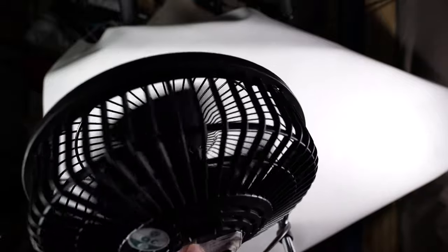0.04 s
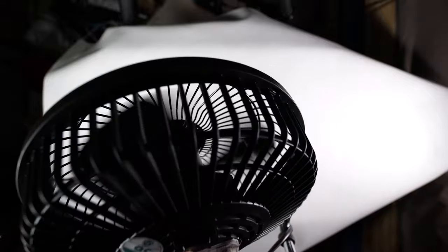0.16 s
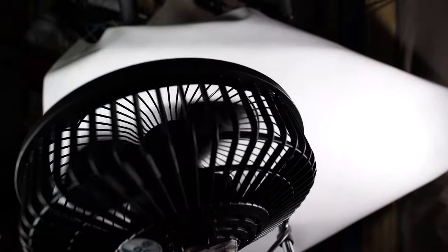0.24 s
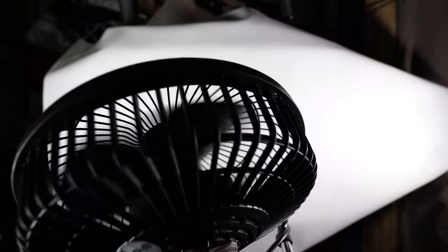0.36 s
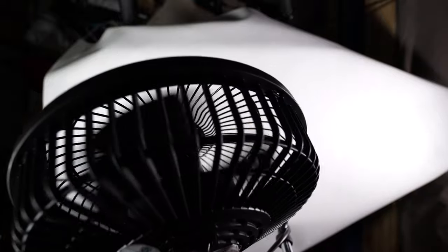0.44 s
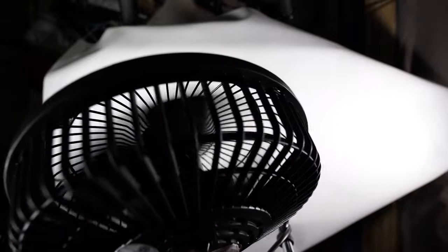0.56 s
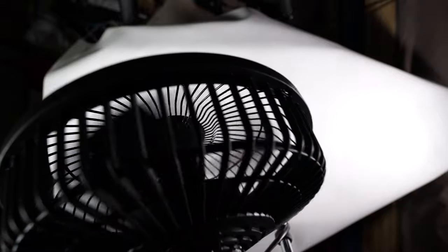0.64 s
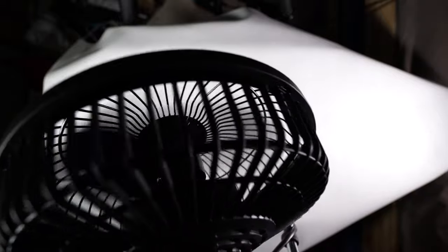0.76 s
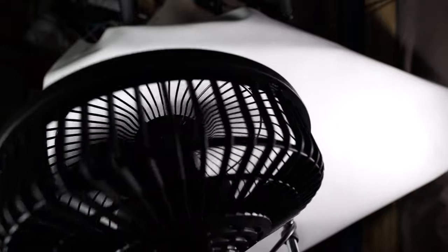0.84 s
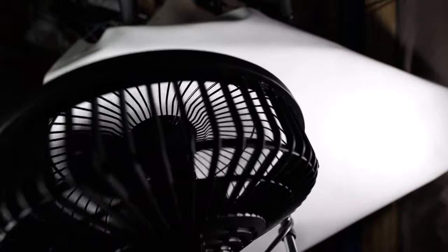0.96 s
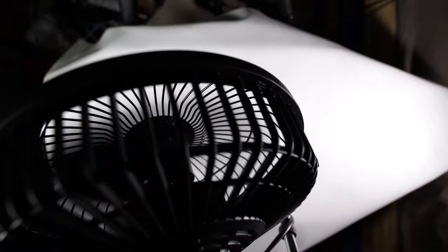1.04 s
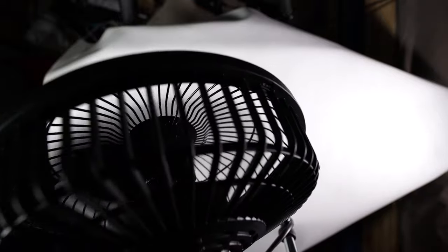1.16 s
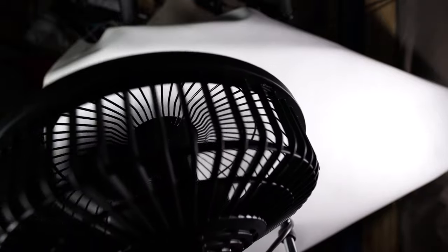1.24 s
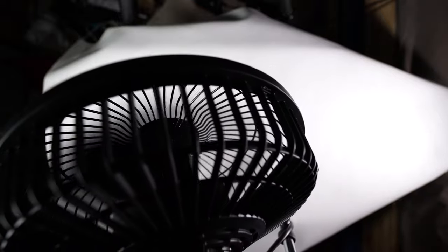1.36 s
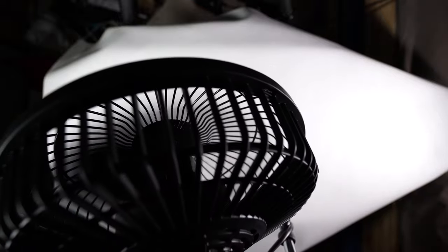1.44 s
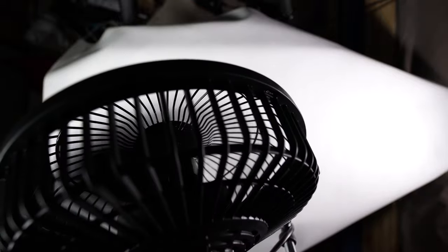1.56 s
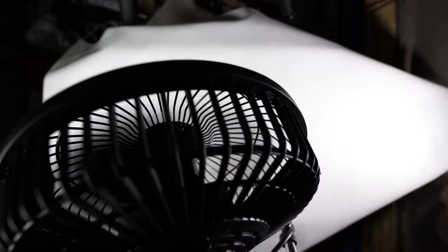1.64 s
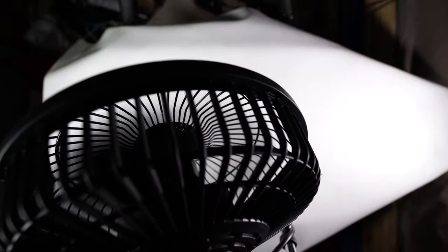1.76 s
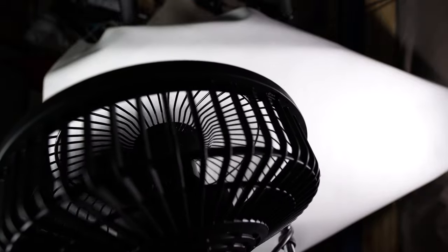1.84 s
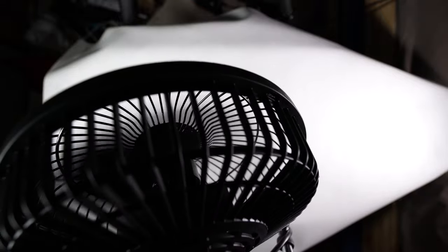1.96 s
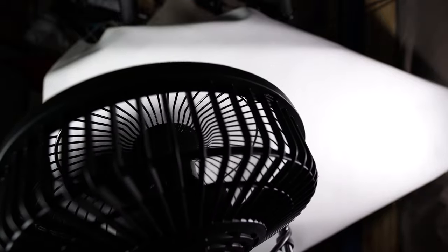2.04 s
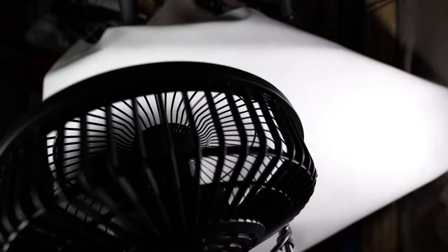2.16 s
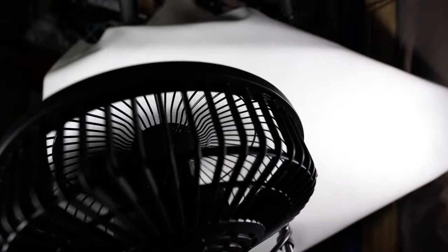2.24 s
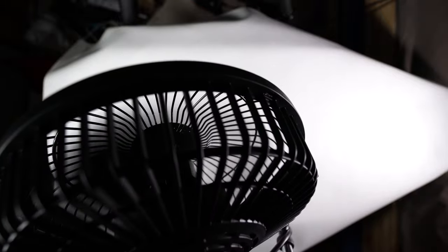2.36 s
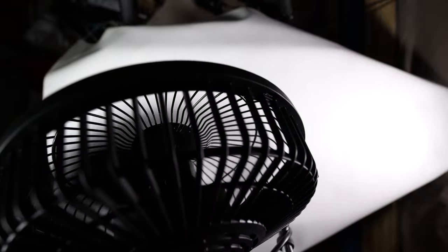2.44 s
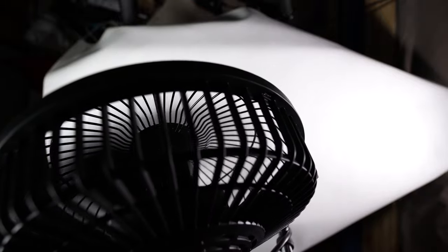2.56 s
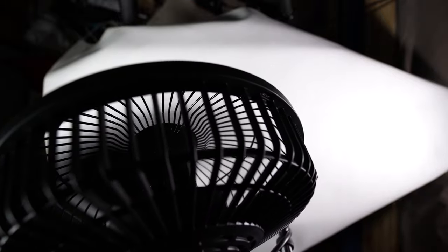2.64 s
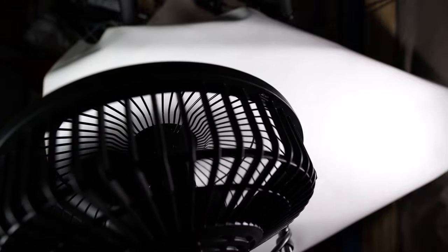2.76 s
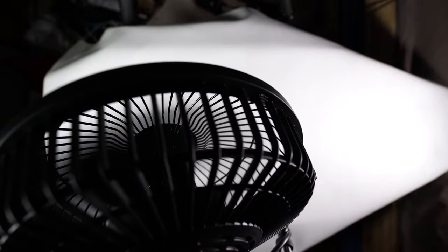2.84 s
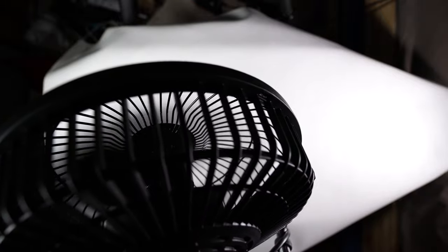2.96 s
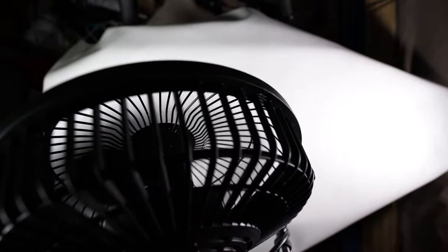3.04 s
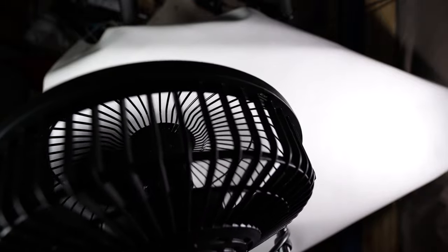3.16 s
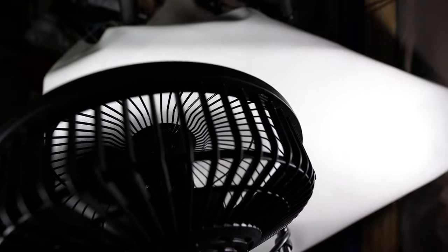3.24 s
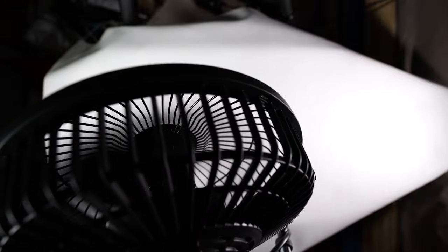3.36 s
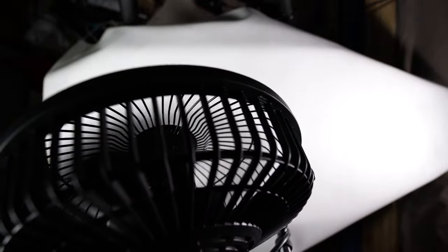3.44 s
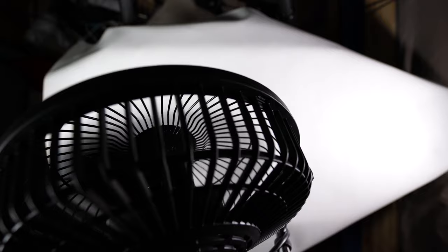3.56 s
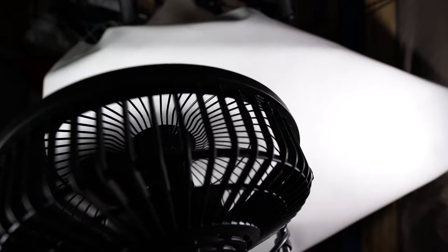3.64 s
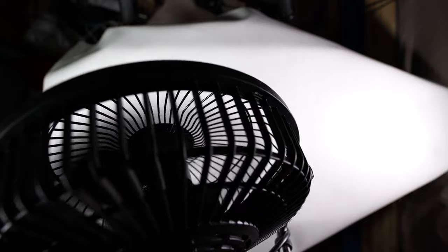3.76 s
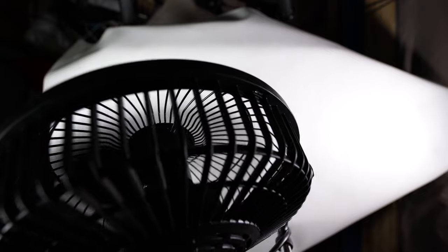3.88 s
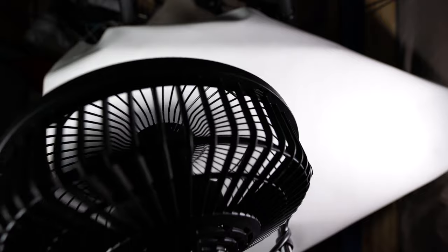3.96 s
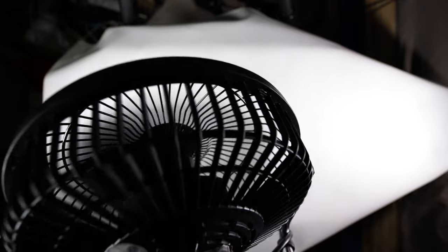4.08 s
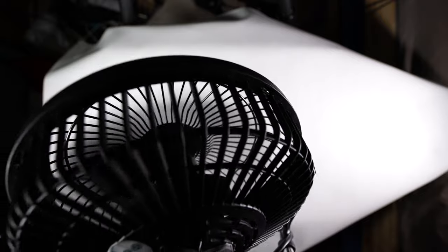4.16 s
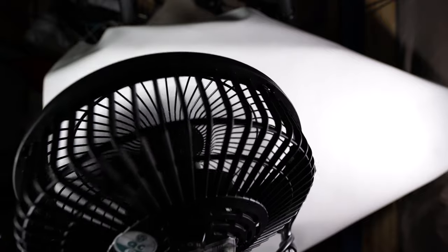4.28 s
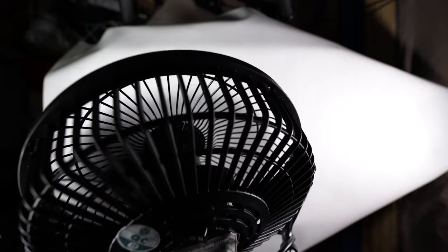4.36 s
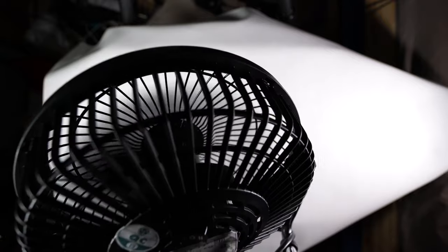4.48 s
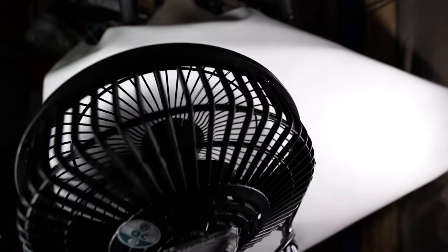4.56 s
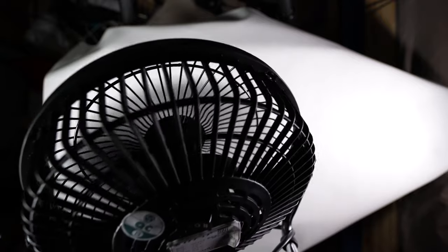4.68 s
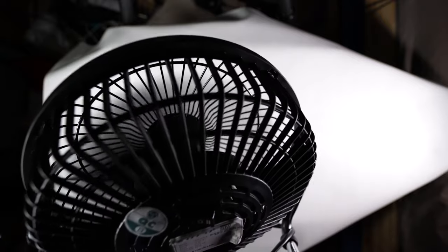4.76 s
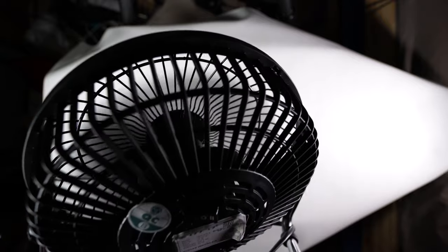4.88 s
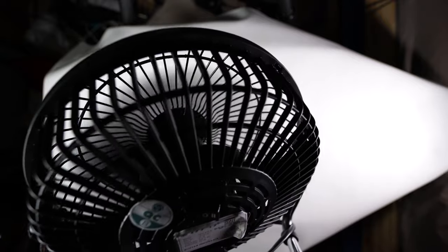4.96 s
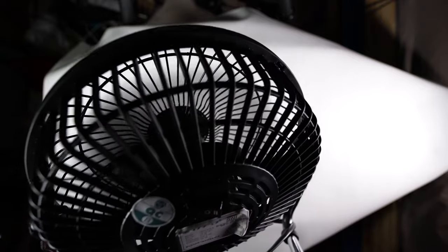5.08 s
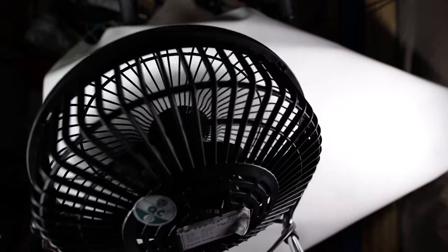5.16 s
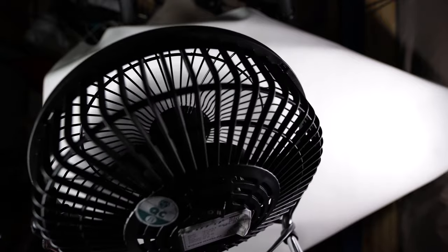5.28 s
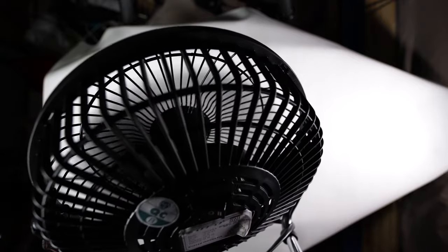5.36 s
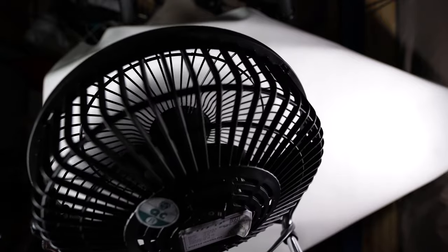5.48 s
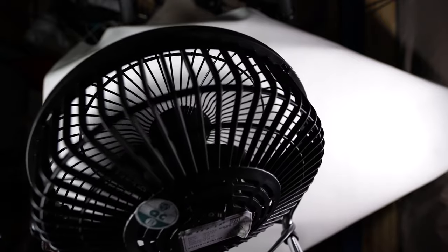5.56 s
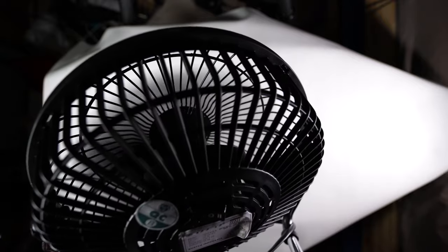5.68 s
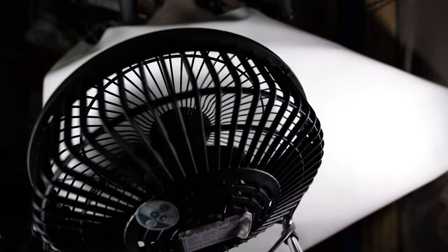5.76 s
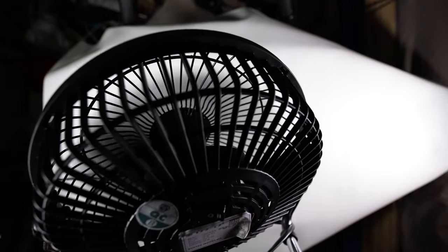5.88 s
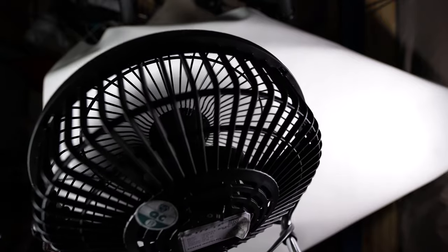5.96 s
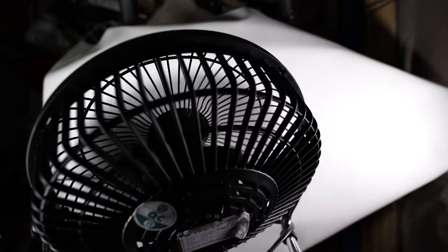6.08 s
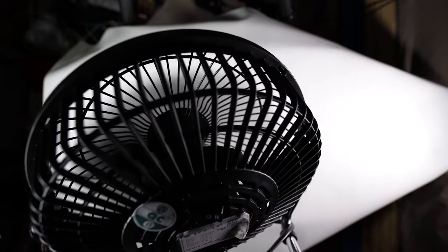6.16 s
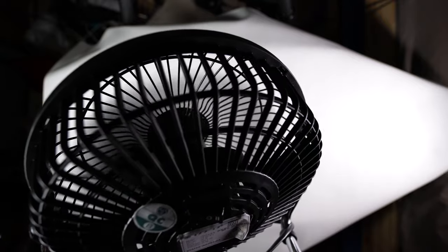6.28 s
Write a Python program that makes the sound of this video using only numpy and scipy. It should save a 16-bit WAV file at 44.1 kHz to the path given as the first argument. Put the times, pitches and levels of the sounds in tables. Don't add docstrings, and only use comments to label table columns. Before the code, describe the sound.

A small desk fan clicks on sharply in a quiet room, its low hum swelling into a throbbing drone with a rush of air.

```python
import sys
import numpy as np
from scipy import signal
from scipy.io import wavfile

SR = 44100
rng = np.random.default_rng(int(sys.argv[2]) if len(sys.argv) > 2 else 0)


def file_out(sig):
    cols = np.atleast_2d(sig).T
    lim = np.clip(cols, -1, 1)
    pcm = np.round(lim * 32767).astype(np.int16)
    wavfile.write(sys.argv[1], SR, pcm)


def linear_from_db(decibels):
    return 10 ** (np.asarray(decibels, float) / 20)


N = 278271

# pitch_hz, level_db (per Hz)
ROOM_COLOUR = [(22, 5), (50, 18), (100, 12), (250, 7), (480, -3), (800, 1), (1100, 0), (1350, -12),
               (1650, -3.5), (2300, -13.5), (3500, -18.5), (7000, -19.5), (10500, -25.5), (16000, -31)]
# pitch_hz, width_hz, level_db
ROOM_WHINE = [(1140, 50, -64), (1600, 100, -67)]
# start_s, level_db, pitch_hz, t60_s
KNOCKS = [(.001, -31.5, 230, 0.12), (0.142, -39.5, 222, 0.16), (.205, -41.5, 330, 0.12),
          (.213, -34.5, 227, 0.067), (.229, -34, 130, 0.041), (.328, -49, 129, .05), (0.379, -38, 104, 0.1),
          (.473, -24, 175, 0.04), (.482, -24.5, 123, 0.12), (0.639, -25, 218, 0.017),
          (0.655, -29, 75, 0.052), (0.657, -31, 103, .2), (1, -31.5, 128.5, 0.28), (2.02, -37, 550, 0.26)]
# start_s, length_s, level_db, loudest_hz, boost_db
SNAPS = [(0.3835, 0.004, -67, 1790, 31), (0.4721, 0.0014, -23, 13700, 4), (.474, 0.022, -47, 1800, 12.5),
         (0.489, 0.0071, -38, 5300, 2), (0.491, 0.035, -53.5, 5300, 7), (0.516, 0.04, -61, 5300, 5),
         (0.637, 0.019, -41, 2500, 5), (0.639, 0.016, -54, 1100, 16), (0.643, 0.0042, -38.5, 5670, 12),
         (0.649, 0.0036, -46, 5700, 4), (0.665, 0.056, -59, 13000, 1), (0.995, 0.0025, -47.5, 12000, 0),
         (1.273, 0.0012, -56, 6800, 0), (2.08, .015, -63, 9500, -3)]
# pitch_hz, width_hz, level_db
SWITCH_BODY = [(900, 400, -8), (1580, 500, -3), (2650, 600, -10), (3800, 600, 0), (5450, 650, -1),
               (7130, 600, -1), (8550, 900, -1), (12000, 700, -12), (13700, 1200, -11), (15300, 1000, -16)]
# start_s, contact_s, level_db
LATCH = (.4716, .0015, -18.5)
# multiple of the blade pass, level_db at full speed,
# growth as a power of speed, share of nearness
LOWER = [(1, -22.5, 2.93, 1.0), (2, -39.3, 1.2, 0.6), (3, -52.5, 2.0, 1.3), (4, -43.3, 1.6, -.1)]
# multiple of the blade pass, level_db at full speed, growth as a power of speed
UPPER = [(5, -51.5, 1.8), (6, -56, 2), (7, -54.5, 2.5), (8, -54, 3), (10, -58.5, 4), (11, -61, 4),
         (12, -60, 4), (13, -61, 4), (14, -60, 4), (16, -58.5, 5), (18, -63, 5)]
# multiple of the turn, level_db at full speed
ROTOR = [(1, -35.5), (2, -44), (4, -52), (5, -59), (7, -65), (8, -65.5), (10, -62)]
# time_s, level_db
NEAR = [(.7, 0.5), (1.1, 2), (1.6, 4), (2.0, 5.5), (2.5, 3.4), (2.9, -.4), (3.4, 0.4), (4.0, -0.14),
        (5.2, 0.26), (6.31, -1.4)]
# pitch_hz, level_db (per Hz)
AIR_COLOUR = [(22, -12.5), (50, 8.5), (130, 12.5), (280, 4.5), (600, -1), (1100, -0.5), (1850, -2),
              (2400, -6), (3200, -7.5), (3900, -16), (5100, -16), (6500, -23), (10500, -31.5), (16000, -44)]
# pitch_hz, width_hz, level_db
CAGE = (4920, 1030, -3)
# peak_s, level_db
CHIRPS = [(.72, -64), (.89, -65), (.94, -63), (1.01, -65.5), (1.12, -70), (1.27, -72), (1.5, -72)]
# pitch_hz, t60_s, level_db
BEARING = [(3440, 0.016, -2.5), (5300, .008, -6), (6800, 0.023, -2), (7450, 0.011, 0), (8300, .006, -5),
           (9200, .006, -3)]

SWITCH_ON_S = 0.473
FULL_PASS_HZ, WIND_UP_S, SLOW_START = 104.198, 0.5743, 2.3532
SWING_S, SWING_LENGTH_S, SWING_LAG_RAD = 4.0, 0.95, 2.6
SWING_DIP_DB, SWING_SECOND_DB, SWING_HUM_DB, SWING_FOURTH_DB = -4, 2.5, -3, -2.5
ROOM_DB = -49
HUM_HZ, HUM_LEAD_RAD, HUM_GROWTH = 100.134, 0.7, 0.86
HUM_DB, HUM_IDLE_DB, INRUSH_DB, INRUSH_S = -39.5, -53, -0.5, 0.14
BUZZ_DB, BUZZ_FROM_S, BUZZ_RISE_S, BUZZ_FADE_DB_PER_S = -45.5, 0.72, 0.061, -0.5
SNAP_CUT_HZ, SCRAPE_DAMPING, SCRAPE_HISS_DB = 12400, 1.6, -13
SWITCH_T60_S, SWITCH_TAIL_DB = 0.35, -23.5
TAIL_SCATTER_DB, TAIL_HZ, TAIL_WIDTH_HZ = 2, 3800, 5000
ROTOR_START_RAD, TONE_SHAKE_DB = 0.29, 0.25
PANEL_HZ, PANEL_WIDTH_HZ, PANEL_DB = 167, 23.5, 5
AIR_DB, AIR_GROWTH, AIR_NEAR = -44.5, 3.13, 0.41
CHIRP_RISE_S, CHIRP_DECAY_S = 0.017, 0.083
OVERLOAD, CUTOFF_HZ, LOW_CUT_HZ = 0.29, 15720, 24


def rms_one(x):
    return x / np.sqrt(np.mean(x ** 2) + 1e-20)


def in_time(rows):
    s, *columns = np.transpose(rows)
    return [np.interp(np.arange(N) / SR, s, column) for column in columns]


def swell(start, rise, decay):
    t = np.arange(N) / SR - start
    return np.clip(t / rise, 0, 1) * np.exp(-np.maximum(t - rise, 0) / decay)


def drift(rate):
    r = np.exp(-80 * np.pi * rate / SR)
    coarse = rng.standard_normal(N // 40 + 2002)
    slow = signal.lfilter([1], [1, -2 * r, r * r], coarse)[2000:]
    return np.interp(np.arange(N) / 40, np.arange(len(slow)), rms_one(slow))


def ring(clicks, hz, t60):
    r = np.exp(-np.log(1000) / (t60 * SR))
    w = 2 * np.pi * hz / SR
    return signal.lfilter([0, np.sin(w)], [1, -2 * r * np.cos(w), r * r], clicks + 1e-18)


def resonance(x, hz, width):
    r = np.exp(-np.pi * width / SR)
    poles = [1, -2 * r * np.cos(2 * np.pi * hz / SR), r * r]
    return signal.lfilter((1 - r * r) / 2 * np.array([1, 0, -1]), poles, x)


def banded_noise(spectrum, patchy_db, tilt_db, count):
    edges = 25 * 2 ** np.arange(0, 9.6, 1 / count)
    white = rng.standard_normal((2, N))
    together = drift(4.4)
    out, power = 0, 0
    curve_hz, curve_db = np.transpose(spectrum)
    for k, (low, high) in enumerate(zip(edges, edges[1:])):
        hz = np.sqrt(low * high)
        band = signal.sosfilt(signal.butter(2, [low, high], "band", fs=SR, output="sos"), white[k % 2])
        flicker_db = patchy_db * (0.72 * together + drift(15.0))
        band = band * linear_from_db(np.interp(np.log(hz), np.log(curve_hz), curve_db) + flicker_db)
        power += np.mean(band ** 2)
        out = out + band * linear_from_db(tilt_db * max(np.log2(hz / 2000), -2.9))
    return out / np.sqrt(power)


def wind_up():
    t = np.arange(N) / SR
    return FULL_PASS_HZ * (1 + np.exp((SWITCH_ON_S - t) / WIND_UP_S)) ** -SLOW_START


def swing():
    return np.pi * np.clip((np.arange(N) / SR - SWING_S) / SWING_LENGTH_S, 0, 1)


def room_tone():
    room = linear_from_db(ROOM_DB) * banded_noise(ROOM_COLOUR, patchy_db=1.5, tilt_db=0.5, count=2)
    for hz, width, db in ROOM_WHINE:
        room = room + linear_from_db(db) * rms_one(resonance(rng.standard_normal(N), hz, width))
    return room


def motor(pass_hz):
    t = np.arange(N) / SR
    running = (t > SWITCH_ON_S) * (pass_hz / pass_hz[-1]) ** HUM_GROWTH
    inrush = linear_from_db(INRUSH_DB) * swell(SWITCH_ON_S, 0.025, INRUSH_S)
    hum = linear_from_db(HUM_IDLE_DB) + linear_from_db(HUM_DB + SWING_HUM_DB * swing() / np.pi) * (running + inrush)
    buzz = linear_from_db(BUZZ_DB + BUZZ_FADE_DB_PER_S * t) * np.clip((t - BUZZ_FROM_S) / BUZZ_RISE_S, 0, 1)
    phase = 2 * np.pi * HUM_HZ * t + HUM_LEAD_RAD
    hum = hum * linear_from_db(1.1 * drift(18.0)) * np.cos(phase)
    buzz = buzz * linear_from_db(1.2 * drift(3.8)) * np.cos(2 * phase)
    return np.sqrt(2) * (hum - buzz)


def knocks():
    out = np.zeros(N)
    for s, db, hz, t60 in KNOCKS:
        blow = np.zeros(SR // 2)
        blow[:44] = linear_from_db(db) / 22 * np.hanning(44)
        i = round(s * SR)
        out[i:i + len(blow)] += ring(blow, hz, t60)
    return out


def scrape(length, loud_hz, boost_db):
    n = round(length * SR)
    burst = rng.standard_normal(3000) * np.r_[np.hanning(n + 2)[1:-1] ** 0.4, np.zeros(3000 - n)]
    rings = linear_from_db(boost_db) * resonance(burst, loud_hz, 0.22 * loud_hz)
    for k, (hz, width, db) in enumerate(SWITCH_BODY):
        rings = rings + (-1) ** k * linear_from_db(db) * resonance(burst, hz, SCRAPE_DAMPING * width)
    rings = rings + linear_from_db(SCRAPE_HISS_DB) * burst * min(length / 0.011, 1)
    return signal.lfilter(*signal.butter(2, SNAP_CUT_HZ, fs=SR), rings)


def latch():
    s, contact, db = LATCH
    t = np.arange(600) / SR
    phases = rng.uniform(0, 2 * np.pi, len(SWITCH_BODY))
    out, i = np.zeros(N), round(s * SR)
    for (hz, width, level_db), phase in zip(SWITCH_BODY, phases):
        shape = np.minimum(t / 0.00011, 1) * np.exp(-np.pi * width * np.maximum(t - contact, 0))
        out[i:i + len(t)] += linear_from_db(db + level_db) * shape * np.cos(2 * np.pi * hz * t + phase)
    return out


def switch():
    body = latch()
    for s, length, db, loud_hz, boost_db in SNAPS:
        i = round(s * SR)
        body[i:i + 3000] += linear_from_db(db + 7.5) * scrape(length, loud_hz, boost_db)
    t = np.arange(SR // 3) / SR
    tail = rng.standard_normal(len(t)) * np.exp(-np.log(1000) * t / SWITCH_T60_S)
    tail = signal.lfilter(*signal.butter(1, 5000, fs=SR), tail) / np.sqrt(np.sum(tail ** 2))
    smeared = resonance(body * rng.choice([-1, 1], N), TAIL_HZ, TAIL_WIDTH_HZ)
    scattered = linear_from_db(-6.0) * body + linear_from_db(TAIL_SCATTER_DB) * smeared
    return body + linear_from_db(SWITCH_TAIL_DB + 13.0) * signal.fftconvolve(scattered, tail)[:N]


def blades(pass_hz, near_db):
    turn = ROTOR_START_RAD + 2 * np.pi * np.cumsum(pass_hz / 3) / SR
    speed_db = 20 * np.log10(pass_hz / pass_hz[-1])
    swung = swing()
    tone_db, second_db, third_db, fourth_db = [
        db + growth * speed_db + share * near_db for _, db, growth, share in LOWER]
    lines = [(3, tone_db + SWING_DIP_DB * np.sin(swung), TONE_SHAKE_DB, 0.034),
             (6, second_db + SWING_SECOND_DB * swung / np.pi, 0.7, 0.08),
             (9, third_db, 3.4, 1.0),
             (12, fourth_db + SWING_FOURTH_DB * swung / np.pi, 1.8, 0.35)]
    lines += [(3 * k, db + growth * speed_db, 2.8, 0.4) for k, db, growth in UPPER]
    lines += [(k, db + (1 + 1.2 / k) * speed_db, 2.3 - 2.1 / k ** 2, 0.4 - 0.38 / k ** 2) for k, db in ROTOR]
    lag = SWING_LAG_RAD * np.cos(swung / 2) ** 2
    out = 0
    for k, db, shake_db, sway in lines:
        panel_db = PANEL_DB / (1 + ((k * pass_hz / 3 - PANEL_HZ) / PANEL_WIDTH_HZ) ** 2)
        phase = k * turn + sway * drift(3.0) + lag * (k == 3)
        out = out + linear_from_db(db + panel_db + shake_db * drift(6.2)) * np.cos(phase)
    return -np.sqrt(2) * out


def air(pass_hz, near_db):
    speed = pass_hz / pass_hz[-1]
    level_db = AIR_DB + AIR_GROWTH * 20 * np.log10(speed) + AIR_NEAR * near_db
    turn = 2 * np.pi * np.cumsum(pass_hz / 3) / SR
    throb = 1 + 0.023 * np.cos(turn) + 0.03 * np.cos(3 * turn)
    rush = banded_noise(AIR_COLOUR, patchy_db=0.5, tilt_db=-6.0 * (1 - speed), count=3)
    cage_hz, width, cage_db = CAGE
    return linear_from_db(level_db + 7.0) * throb * (rush + linear_from_db(cage_db) * resonance(rush, cage_hz, width))


def bearing():
    level = sum(linear_from_db(db) * swell(s - CHIRP_RISE_S, CHIRP_RISE_S, CHIRP_DECAY_S) for s, db in CHIRPS)
    sizes = linear_from_db(4.4 * np.minimum(rng.exponential(1, N), 4)) * rng.choice([-1, 1], N)
    slips = sizes * (rng.random(N) < 2500 * linear_from_db(3.0 * drift(25.0)) / SR)
    dealt = rng.integers(0, len(BEARING), N)
    rings = sum(linear_from_db(db) * ring(slips * (dealt == k), hz, t60) for k, (hz, t60, db) in enumerate(BEARING))
    return level * rms_one(rings)


def scene():
    pass_hz = wind_up()
    near_db, = in_time(NEAR)
    handling = knocks() + switch()
    fan = motor(pass_hz) + blades(pass_hz, near_db) + air(pass_hz, near_db) + bearing()
    return (room_tone() + handling + fan)[None]


def roll_off(x):
    return signal.sosfilt(signal.butter(12, 17170, fs=SR, output="sos"), x)


def record(dry):
    limited = dry / (1 + (dry / OVERLOAD) ** 6) ** (1 / 6)
    limited = signal.sosfilt(signal.butter(2, LOW_CUT_HZ, "high", fs=SR, output="sos"), limited)
    mix = signal.sosfilt(signal.ellip(9, 0.5, 50, CUTOFF_HZ, fs=SR, output="sos"), limited)
    return roll_off(mix)


dry = scene()
out = record(dry)
file_out(out)
```